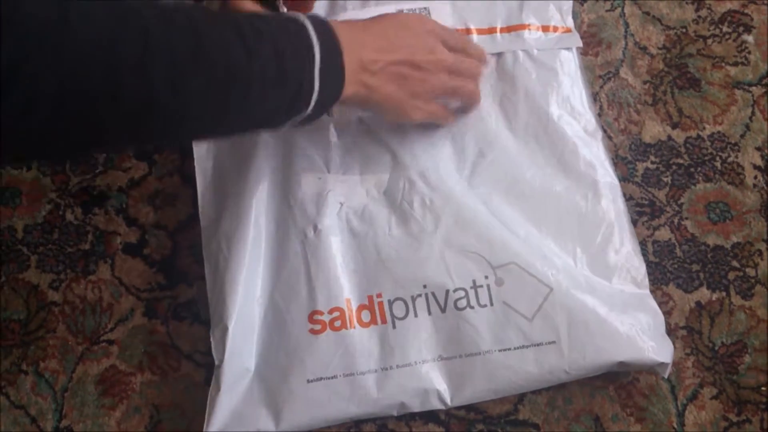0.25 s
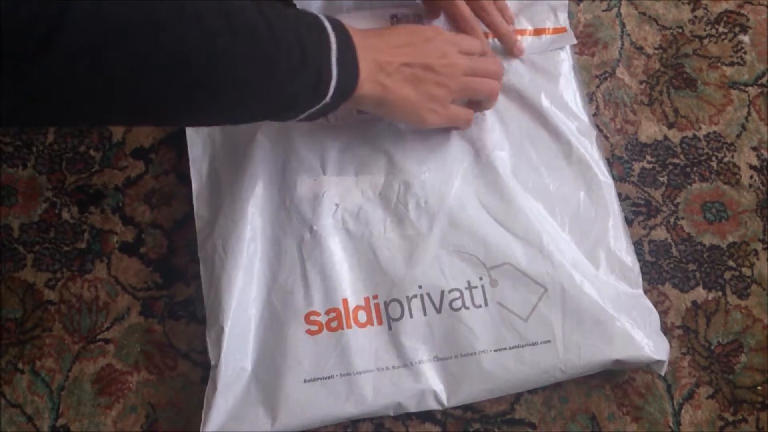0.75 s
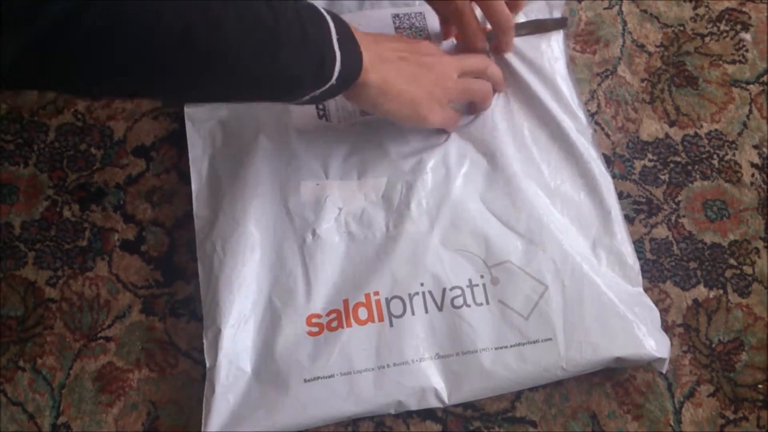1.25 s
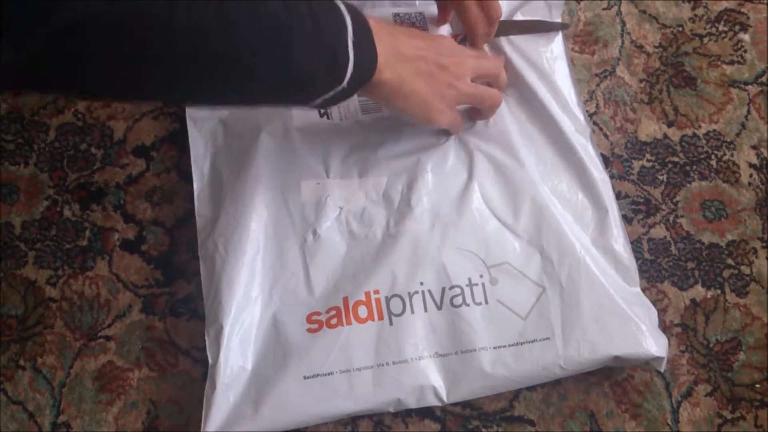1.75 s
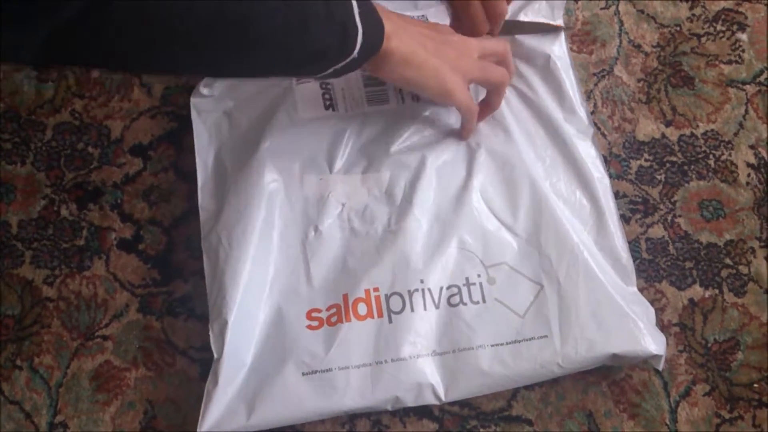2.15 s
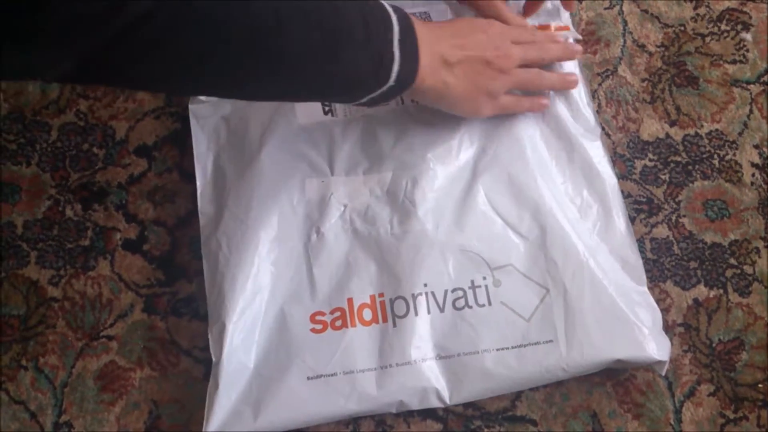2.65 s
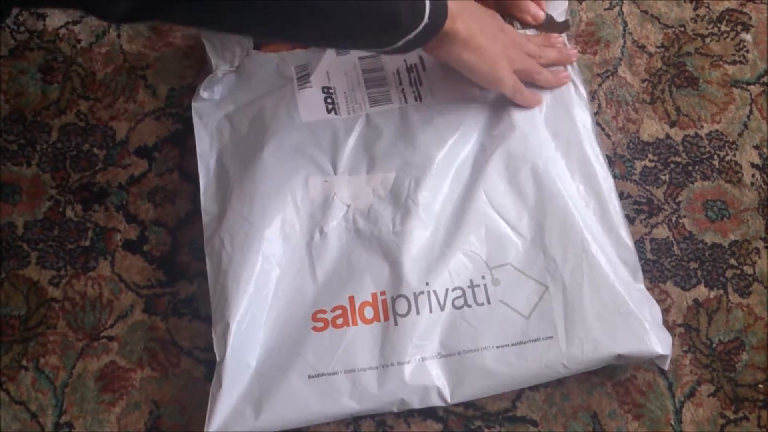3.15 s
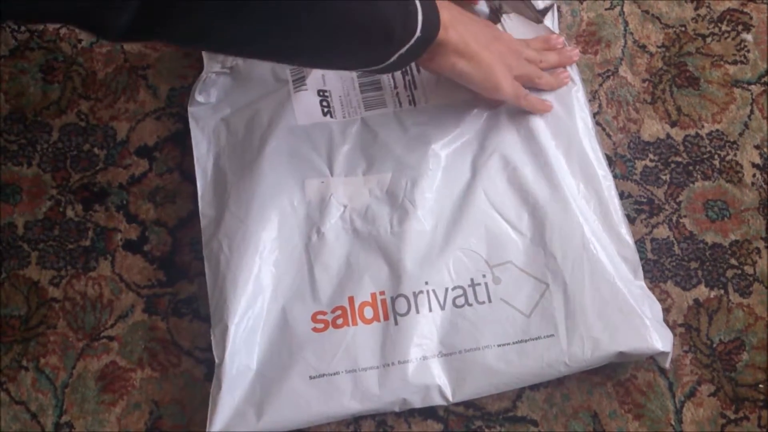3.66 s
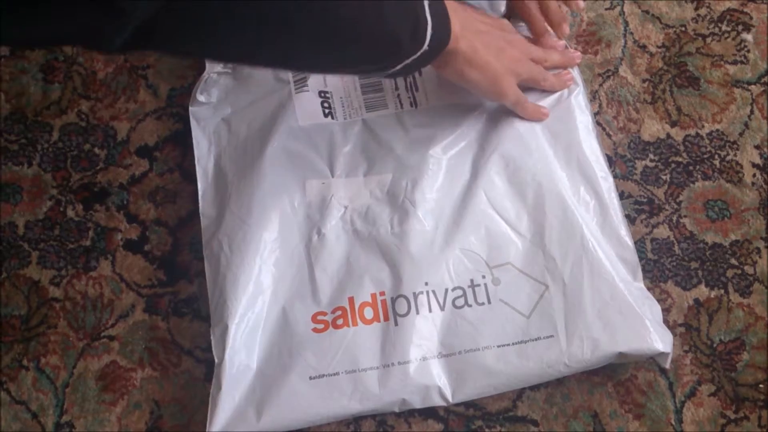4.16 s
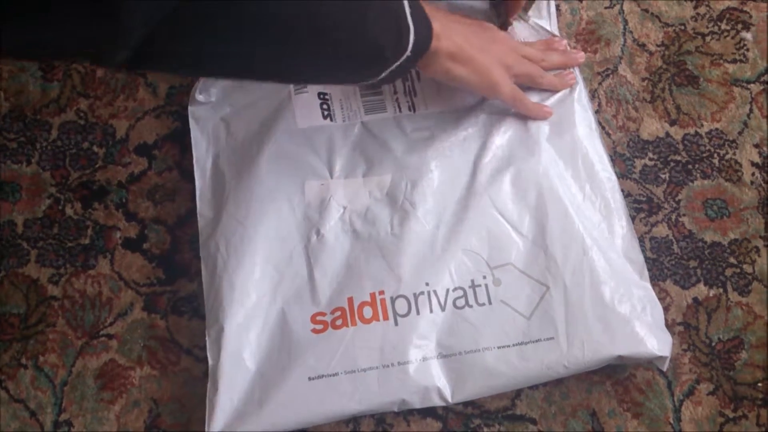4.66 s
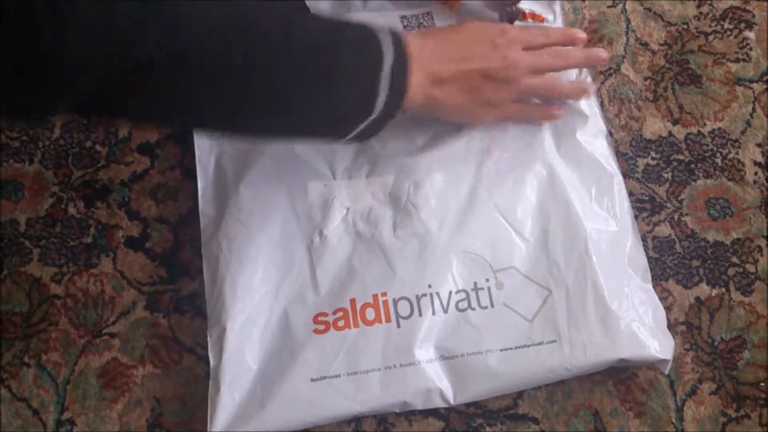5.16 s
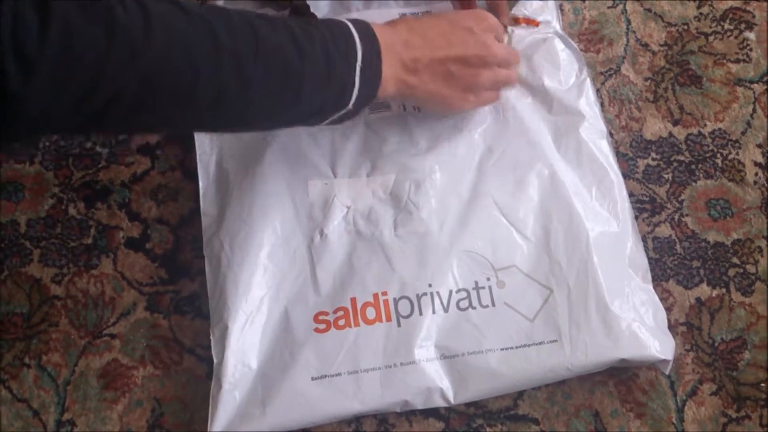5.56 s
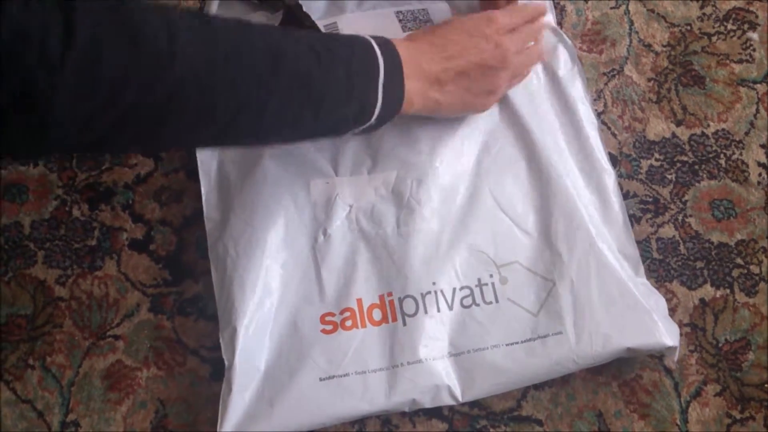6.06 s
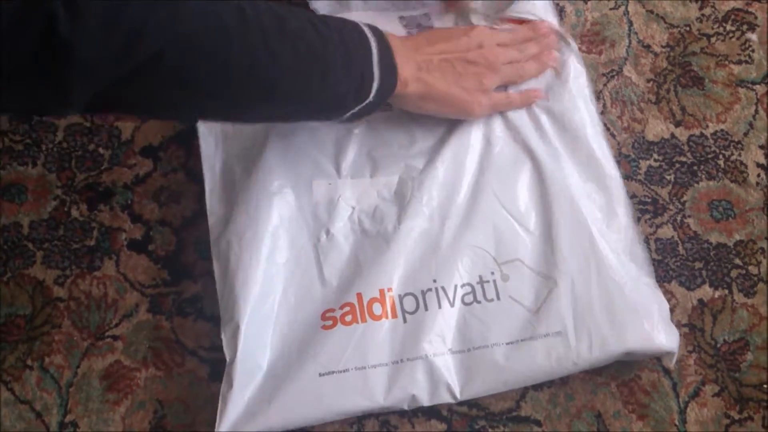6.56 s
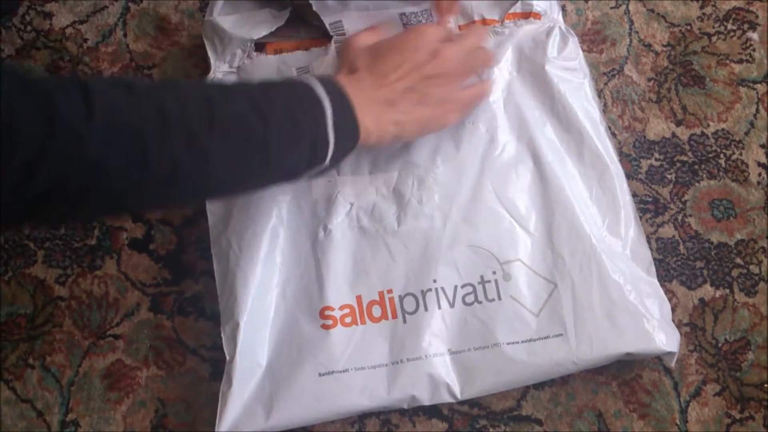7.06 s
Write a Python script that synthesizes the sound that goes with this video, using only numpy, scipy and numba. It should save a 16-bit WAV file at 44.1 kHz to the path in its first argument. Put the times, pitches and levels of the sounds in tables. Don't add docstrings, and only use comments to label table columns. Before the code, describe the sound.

Close mono sound of plastic film being pulled: fine bright crackle, duller panel rustle, sharp crease ticks and quick three- or four-pop peeling bursts. Activity is uneven, with brief lulls between pulls, soft thuds on carpet, two strong crackling peaks late on, and a gentle ending. Short indoor reverberation, low steady room tone and a very thin high electronic whine.

```python
import sys
import numpy as np
from scipy import signal
from scipy.io import wavfile
from scipy.ndimage import uniform_filter1d
from numba import njit

SR = 44100
rng = np.random.default_rng(int(sys.argv[2]) if len(sys.argv) > 2 else 0)


def level_to_linear(level):
    exponent = np.asarray(level, float) / 20
    return 10 ** exponent


def wrap_up_sound(samples):
    columns = np.atleast_2d(samples).T
    tamed = np.clip(columns, -1, 1)
    steps = np.round(tamed * 32767).astype(np.int16)
    wavfile.write(sys.argv[1], SR, steps)


N = 322371

# frequency in Hz, density in dB per Hz.
ROOM_TONE = [(30, -23), (80, 1), (110, -0.5), (280, -4), (345, 3), (420, -6.5), (600, -32.5), (830, -2),
             (1000, -13), (3200, -8), (6000, -11), (11000, -19), (16000, -48)]
# frequency in Hz, rms level in dB.
WHINE_LINES = [(12032, -84), (12110, -84), (12306, -78)]
# frequency in Hz, time to fall by 60 dB in seconds.
REVERB_TIME = [(300, .6), (2000, .55), (6000, .5), (14000, .42)]
# delay in seconds, level in dB.
EARLY_ECHOES = [(.0013, -11), (.0027, -14), (.0117, -19)]
# start in seconds, peak in dB, frequency in Hz.
CARPET_BUMPS = [(0.05, -61, 129), (0.508, -56, 93), (0.799, -36.5, 650), (1.669, -30, 715),
                (2.129, -38, 440), (2.24, -39, 323), (3.999, -26.5, 635), (4.391, -34, 600),
                (4.629, -66, 98), (5.369, -65, 78.1), (6.951, -39, 322), (7.03, -62, 337)]
# start in seconds, hold in seconds, fine crackle in dB,
# panel rustle in dB relative to the crackle.
TUGS = [(0, 0.054, -50.5, -4), (0.232, 0.29, -57, 0), (0.602, 0.13, -53, -9.5), (0.774, 0.1, -49.5, -2.5),
        (0.961, 0.067, -46, -6), (1.08, 0.24, -52, -5), (1.339, 0.11, -39.5, -9.5),
        (1.658, 0.24, -48, -6.5), (1.98, 0.22, -46, -8), (2.24, 0.25, -44.5, -7), (2.71, 0.26, -55, -3.5),
        (2.955, 0.07, -38, -6), (3.083, 0.41, -46, -9.5), (3.35, 0.045, -44, 1), (3.556, 0.29, -48, -30),
        (3.989, 0.029, -49, 10.5), (4.29, 0.063, -49.5, -16), (4.39, 0.12, -42.5, -2.5),
        (4.57, 0.1, -46.5, -31), (4.76, 0.075, -32, -16), (4.88, 0.21, -43.5, -13.5),
        (5.122, 0.068, -43, -7), (5.492, 0.14, -48.5, -5.5), (5.708, 0.25, -49, -3.5),
        (5.96, 0.17, -41.5, -8), (6.184, 0.14, -42, -7), (6.644, 0.041, -25, -10.5),
        (6.72, 0.093, -37.5, -7), (6.863, 0.056, -40, -3.5), (7.082, 0.3, -52, -6.5)]
# frequency in Hz, density in dB per Hz.
FILM_COLOUR = [(100, 8), (400, 18), (800, 12.5), (2000, 21), (3300, 9.5), (5000, 15), (6500, 15.5),
               (9000, 15.5), (12500, 11.5), (15500, 13)]
# start in seconds, peak in dB, ring in Hz.
TICKS = [(0.0564, -40, 6100), (0.2464, -29.5, 5850), (0.319, -34, 5550), (1.1964, -18.5, 6800),
         (1.24, -33.5, 6870), (1.3116, -25.5, 7900), (1.5207, -31, 6550), (2.029, -30, 7400),
         (2.265, -31, 5470), (2.313, -35, 6560), (2.593, -37, 6800), (2.7131, -28, 7000),
         (2.9444, -18.5, 7000), (3.0111, -22.5, 6600), (3.3515, -35, 6440), (3.3723, -24.5, 4180),
         (3.4338, -29, 5970), (3.7522, -23.5, 6160), (4.245, -35.5, 5700), (4.3995, -31.5, 6400),
         (4.718, -22.5, 7100), (5.0487, -26, 7840), (5.439, -32.5, 5570), (5.9224, -27, 6650),
         (6.0461, -25.5, 5240), (6.1259, -28.5, 6700), (6.1969, -22, 7600), (6.473, -36, 9100),
         (6.5748, -23.5, 7700), (6.7297, -22, 7200)]
# first and second step in seconds, their peaks in dB, ring in Hz.
DOUBLES = [(.6484, .657, -30.5, -39, 5900), (.879, .8931, -30, -37, 6600), (.9354, .9492, -32.5, -39, 6400),
           (.9725, .9805, -28, -30, 6560), (1.1105, 1.1195, -32, -31, 7700),
           (1.6755, 1.6834, -22, -22, 7100), (2.1885, 2.2077, -34, -46, 6100),
           (2.7788, 2.7866, -33, -31, 5650), (3.6024, 3.612, -52, -34, 6840),
           (3.7135, 3.7264, -25.5, -35, 6000), (3.9998, 4.0124, -21, -19, 7540),
           (4.644, 4.6486, -24, -22, 7840), (4.8235, 4.8322, -20, -32, 6950),
           (4.8709, 4.8851, -30, -30, 6400), (5.3829, 5.3949, -37.5, -42, 7250),
           (6.2418, 6.2615, -27, -29, 5500), (6.8788, 6.8905, -36, -21, 7400),
           (7.2222, 7.2418, -37, -32.5, 7250)]
PEEL_RUNS = {3: [(1.1298, 1.1737, -26.5, -24.5, 6600), (1.3756, 1.4048, -24, -26, 5300),
             (1.922, 1.9527, -25, -29.5, 5800), (2.821, 2.8626, -38, -25.5, 6600),
             (2.9748, 2.9941, -23.5, -20, 6900), (3.1639, 3.187, -23.5, -31, 5800),
             (3.9691, 3.9887, -30.5, -16.5, 6850), (4.2876, 4.3109, -36, -35.5, 6000),
             (4.487, 4.5171, -26, -43, 7040), (4.558, 4.5818, -32, -22, 6900),
             (4.7685, 4.793, -6, -34, 6560), (5.4998, 5.511, -34, -35.5, 5900),
             (5.525, 5.555, -35.5, -32.5, 6100), (5.7471, 5.781, -29.5, -28.5, 5750),
             (5.984, 6.017, -35, -29, 6940), (6.0605, 6.0829, -32, -52, 5800),
             (6.5996, 6.6424, -13, -14, 6850)], 4: [(1.774, 1.818, -34, -30.5, 6270),
             (1.9681, 1.991, -24.5, -26.5, 6300), (3.2461, 3.298, -24, -41, 7360),
             (6.6533, 6.677, -10.5, -21, 8000)]}
# start in seconds, peak in dB, ring in Hz,
# panel thump in dB relative to the snap, panel frequency in Hz.
PANEL_SNAPS = [(1.3576, -26, 6140, -9, 1700), (1.6676, -25, 6700, -8.5, 1190),
               (2.1379, -26.5, 5400, -8.5, 900), (2.2483, -20, 5630, -15.5, 1520),
               (2.3285, -19, 7260, -29, 2150), (2.4332, -28, 5800, -7, 1410),
               (2.4838, -31.5, 5360, -6.5, 1760), (3.3613, -18, 5460, -9, 1970),
               (3.5549, -29.5, 6200, -3, 1370), (3.5642, -26.5, 6100, -14, 1395),
               (3.7686, -20.5, 4960, -14, 1970), (3.7838, -26.5, 5200, 2, 1950),
               (4.3903, -24, 8200, -3, 1400), (4.4378, -32.5, 5840, 2.5, 1800),
               (4.5886, -25, 5270, -2.5, 1800), (4.7564, -5.5, 6900, -15, 1740),
               (4.8556, -6, 6400, -4.5, 2300), (5.1464, -27, 5500, -8.5, 2000),
               (5.167, -27, 6860, -7, 1750), (5.1911, -31.5, 6400, -5.5, 1920),
               (5.7173, -22, 6840, -18, 1340), (5.8562, -26, 6600, -10, 1320),
               (5.9604, -22.5, 5800, -10, 1780), (6.9377, -29.5, 7540, 1, 1060)]
# frequency in Hz, gain in dB.
MIC_TREBLE = [(100, -0.5), (11000, 3.5), (13500, 5), (16000, -3)]


def level(x, db):
    return x * level_to_linear(db) / np.sqrt(np.mean(x ** 2))


def colour(x, table):
    hz, db = np.transpose(table)
    grid = np.arange(2049) * SR / 4096 + 1
    log_gain = np.log(level_to_linear(np.interp(np.log(grid), np.log(hz), db)))
    cepstrum = np.fft.irfft(log_gain)
    cepstrum[1:2048] *= 2
    cepstrum[2049:] = 0
    response = np.fft.irfft(np.exp(np.fft.rfft(cepstrum)))
    return signal.fftconvolve(x, response)[:len(x)]


@njit
def grains(start, hz, cycles, size, phase, rise, length):
    out = np.zeros(length)
    for k in range(len(start)):
        step = hz[k] / SR
        for j in range(int(6 * cycles[k] / step) + 2):
            i, turn = int(start[k]) + j, j * step
            if 0 <= i < length:
                swell = 1 - np.exp(-(turn + step) / rise)
                decay = np.exp(-turn / cycles[k])
                out[i] += size[k] * swell * decay * np.cos(2 * np.pi * turn + phase[k])
    return out


def background():
    t = np.arange(N) / SR
    out = level(colour(rng.standard_normal(N), ROOM_TONE), -63)
    bass = signal.sosfilt(signal.butter(2, 450, fs=SR, output="sos"), out)
    wander_db = 0.7 * np.interp(t, np.arange(64) / 8, rng.standard_normal(64))
    out = out + bass * (level_to_linear(wander_db) - 1)
    for hz, db in WHINE_LINES:
        drift = np.cumsum(rng.standard_normal(N)) * .02
        out = out + np.sqrt(2) * level_to_linear(db) * np.sin(2 * np.pi * hz * t + drift)
    return out


def room_answer():
    tail_db, onset_s = -5.5, .011
    t = np.arange(SR) / SR
    hz, t60 = np.transpose(REVERB_TIME)
    tail = np.zeros(SR)
    for centre in 125 * 2 ** np.arange(0, 7.1):
        edges = [centre / 2 ** .5, min(centre * 2 ** .5, .45 * SR)]
        band = signal.butter(2, edges, "band", fs=SR, output="sos")
        decay_s = np.interp(np.log(centre), np.log(hz), t60)
        tail += signal.sosfilt(band, rng.standard_normal(SR)) * 1000 ** (-t / decay_s)
    tail *= 1 - np.exp(-(t / onset_s) ** 2)
    tail *= level_to_linear(tail_db) / np.sqrt(np.sum(tail ** 2))
    tail[0] = 1
    for s, db in EARLY_ECHOES:
        tail[int(s * (.8 + .4 * rng.random()) * SR)] += level_to_linear(db)
    return tail


def room(x, count=4):
    spot = np.repeat(rng.integers(count, size=N // 512 + 1), 512)[:N]
    out = np.zeros(N)
    for k in range(count):
        here = uniform_filter1d(1. * (spot == k), 64)
        out += signal.fftconvolve(x * here, room_answer())[:N]
    return out


def bumps():
    s, db, hz = np.transpose(CARPET_BUMPS)
    cycles = np.clip(150 / hz, .6, 1.5)
    return grains(s * SR, hz, cycles, level_to_linear(db + 5), 0 * s, .4, N)


def effort(t):
    grip_db_per_s, let_go_db_per_s = 904, 246
    rest_db = -61.5
    start, hold, fine_db, panel_db = np.transpose(TUGS)[:, :, None]
    grip_db = grip_db_per_s * np.maximum(start - t, 0)
    slack_db = let_go_db_per_s * np.maximum(t - start - hold, 0)
    gains = []
    for db in (fine_db, fine_db + panel_db):
        power = np.sum(level_to_linear(2 * (db - grip_db - slack_db)), axis=0)
        gains.append(np.sqrt(power + level_to_linear(2 * rest_db)))
    return gains


def crackle(rate, low_hz, octaves, cycles, spread_db, bunch):
    chance = rng.random((20000, 5)).T
    gaps = (-np.log(1 - chance[0])) ** bunch
    gaps = gaps / np.mean(gaps) / rate
    size = level_to_linear(np.minimum(-spread_db * np.log(1 - chance[1]), 13))
    hz = low_hz * 2 ** (octaves * chance[2])
    x = grains(np.cumsum(gaps) * SR, hz, cycles * (.5 + chance[3]), size, 2 * np.pi * chance[4], 0.022, N)
    return level(x, 0)


def handling():
    t, steps = np.arange(N) / SR, np.arange(0, N / SR + .002, .002)
    fine_gain, panel_gain = (np.interp(t, steps, gain) for gain in effort(steps))
    jerks_db = 2.5 * np.interp(t, np.arange(200) / 26, rng.standard_normal(200))
    fine = crackle(1700, 3500, 2.0, 1.8, spread_db=4.5, bunch=1.7)
    fine = level(colour(fine, FILM_COLOUR), 0)
    panel = crackle(1200, 500, 2.9, 1.0, spread_db=3.3, bunch=1.4)
    return level_to_linear(jerks_db - 8.5) * (fine_gain * fine + panel_gain * level_to_linear(-3) * panel)


def peeling(thump_db):
    slips = []
    for count, runs in {2: DOUBLES, **PEEL_RUNS}.items():
        for first, last, from_db, to_db, hz in runs:
            times, peaks = np.linspace(first, last, count), np.linspace(from_db, to_db, count)
            slips.extend(zip(times, peaks, [hz] * count))
    s, db, hz = np.transpose(slips)
    ring_hz = hz * 2 ** (.25 * (rng.random(len(s)) - .5))
    return np.column_stack([s, db, ring_hz, np.full(len(s), thump_db)])


def strays(thump_db, per_s=36, over_crackle_db=13, spread_db=14, ring_hz=6400):
    gap, size, pitch = rng.random((300, 3)).T
    s = np.cumsum(-np.log(1 - gap)) / per_s
    db = 20 * np.log10(effort(s)[0]) + over_crackle_db - spread_db * size
    panel_db = thump_db + 2 * spread_db * (gap - .5)
    return np.column_stack([s, db, ring_hz * 2 ** (pitch - .5), panel_db])


def buckles():
    run_thump_db, tick_thump_db = -22, -30
    ticks = [(*tick, tick_thump_db) for tick in TICKS]
    thin = np.vstack([peeling(run_thump_db), ticks, strays(run_thump_db)])
    panel_hz = 1716 * 2 ** (rng.random(len(thin)) - .5)
    return np.vstack([PANEL_SNAPS, np.column_stack([thin, panel_hz])])


def snaps(crack_db=-14, ring_db=7, thump_db=6, panel_slip_db=5, count=9):
    s, db, hz, panel_db, panel_hz = buckles().T
    chance = rng.random((len(s), 6 + 4 * count)).T
    at, turn = (s - .0002) * SR, 2 * np.pi * chance
    blunt = np.full(len(s), .55)
    crack = grains(at, 9000 + 4000 * chance[0], blunt, level_to_linear(db + crack_db), turn[1], 0.033, N)
    out = grains(at, hz, .9 + .8 * chance[2], level_to_linear(db + ring_db), turn[3], .3, N)
    out += grains(at, panel_hz, blunt, level_to_linear(db + panel_db + thump_db), turn[4], .2, N)
    for late, pitch, size, phase in chance[6:].reshape(count, -1, len(s)):
        late = late ** 1.5 - .04
        when = at + SR * .0055 * late
        slip_db = db + ring_db - 9 - 15 * np.abs(late) - 8 * size
        panel_slip = level_to_linear(slip_db + panel_db + panel_slip_db)
        angle = 2 * np.pi * phase
        out += grains(when, hz * 2.2 ** (pitch - .45), 4 * blunt, level_to_linear(slip_db), angle, .3, N)
        out += grains(when, panel_hz * 2.6 ** (pitch - .2), blunt, panel_slip, angle, .2, N)
    band = signal.butter(2, [600, 11500], "band", fs=SR, output="sos")
    return colour(crack, FILM_COLOUR) + signal.sosfilt(band, out)


def scene():
    bag = snaps() + handling() + bumps()
    return (room(bag) + background())[None]


def roll_off(x):
    return signal.sosfilt(signal.butter(12, 16640, fs=SR, output="sos"), x)


def record(dry):
    x = colour(dry[0], MIC_TREBLE)
    x = signal.sosfilt(signal.butter(2, 65, "high", fs=SR, output="sos"), x)
    x = np.tanh(x)
    x = signal.sosfilt(signal.ellip(10, .2, 26, 15760, fs=SR, output="sos"), x)
    return roll_off(x[None])


dry = scene()
out = record(dry)
wrap_up_sound(out)
```